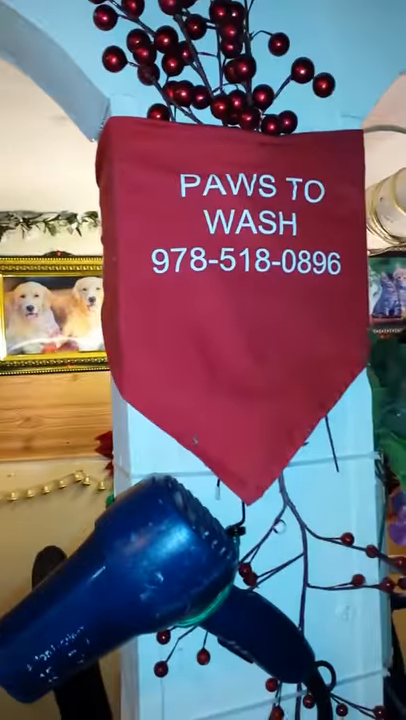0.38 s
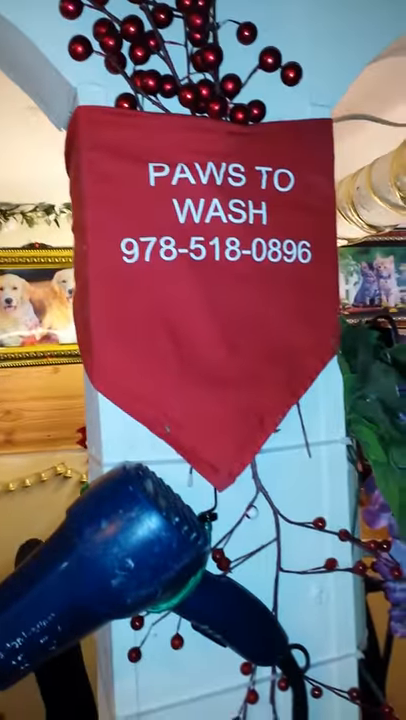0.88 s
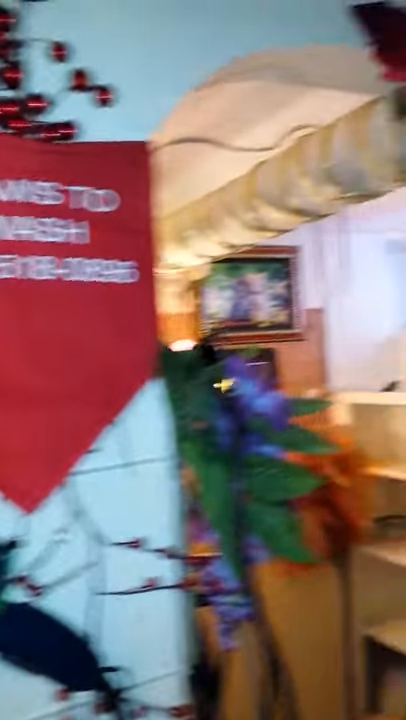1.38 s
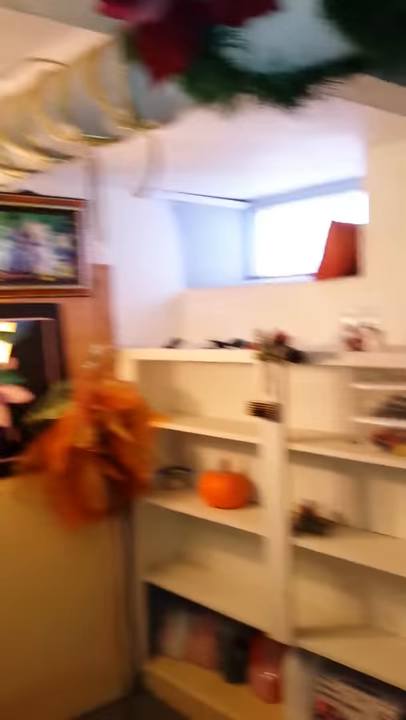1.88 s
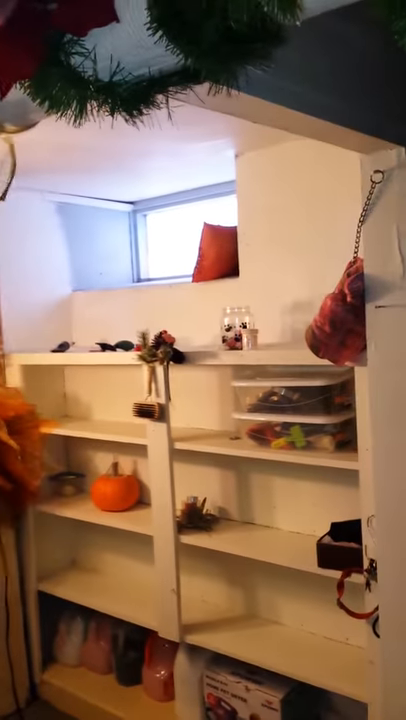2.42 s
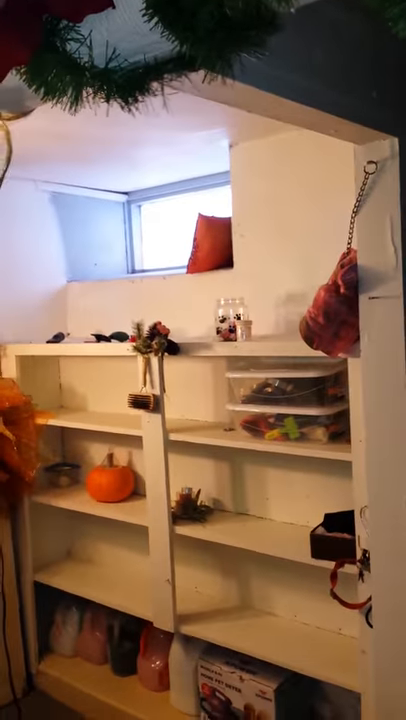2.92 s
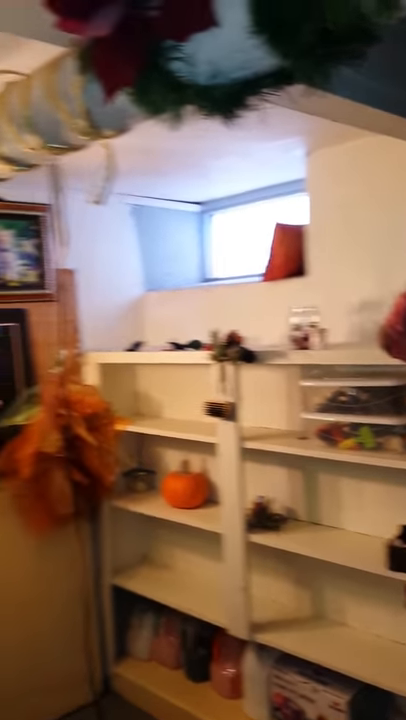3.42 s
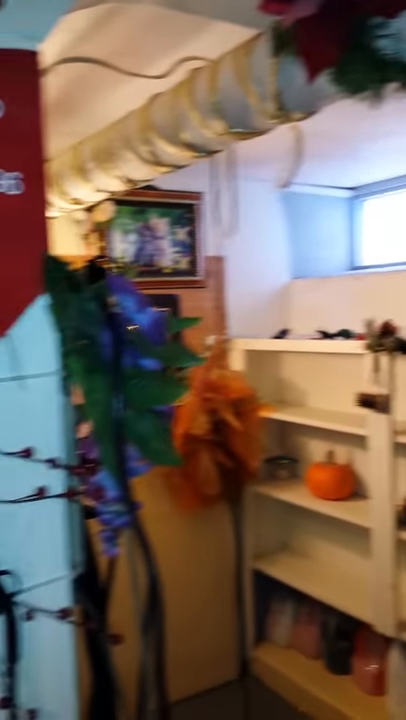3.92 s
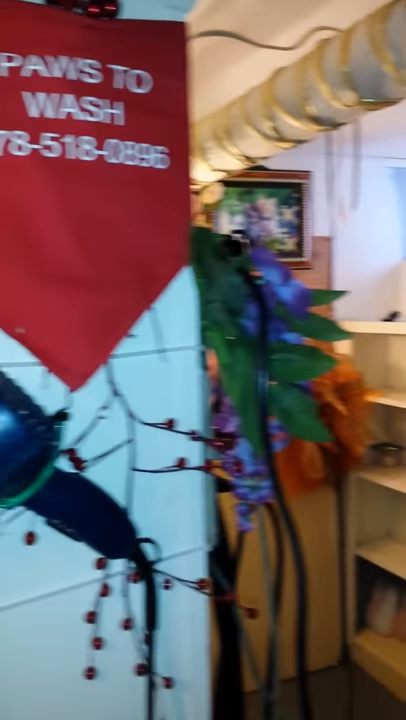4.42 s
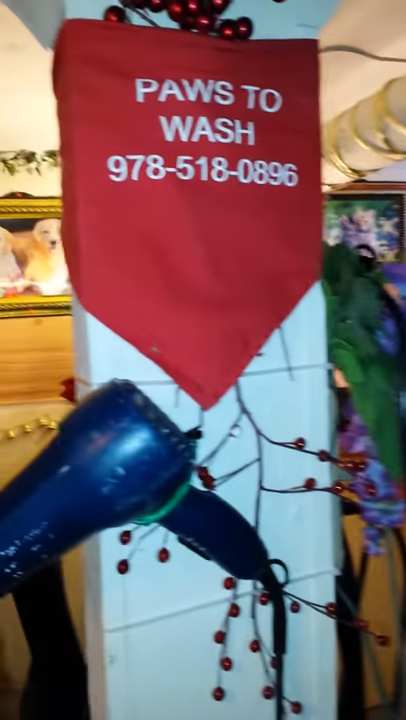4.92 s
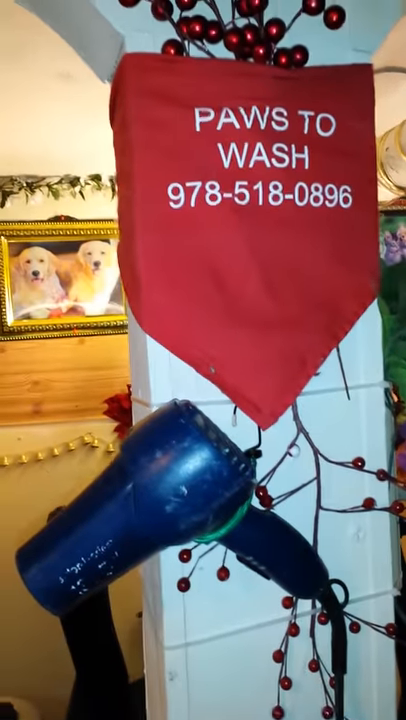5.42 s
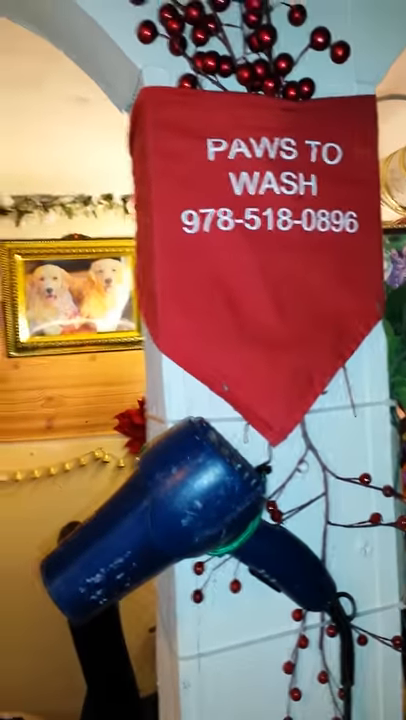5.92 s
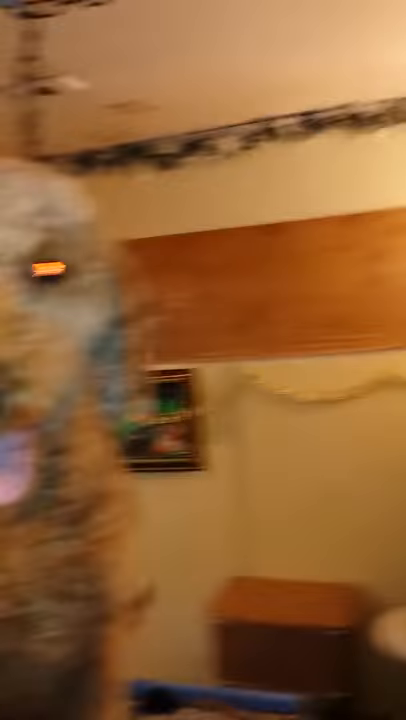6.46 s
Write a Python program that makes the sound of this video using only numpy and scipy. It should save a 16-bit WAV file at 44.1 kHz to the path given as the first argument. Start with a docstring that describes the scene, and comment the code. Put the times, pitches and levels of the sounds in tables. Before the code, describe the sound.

From 0 to about 6.6 seconds a small blow dryer runs continuously, already at full speed and never stopping. Close, bright air roar fills both ears, dense and hissy, with a hollow barrel resonance. Inside it sit a steady fan tone near 1.46 kHz, its overtones, and a thin whine around 7.3 kHz, shimmering and wandering left and right; pitch barely sags. Around 1.2 to 2 seconds the tone colour and stereo balance shift, then settle until about 3.3, changing again from 3.5 to 5 and after 6. Very faint dog pants puff at 0.2, from 0.7 to 2.1, 2.5 to 3.4, 3.6 to 4.3, and 4.5 to 6.2 seconds, about five per second. Soft, dull footfalls land near 3.4, 3.7, 4.0 and 4.4. Low mains hum and room rumble lie beneath. Indoor, handheld stereo microphone.

```python
"""Blow dryer in a grooming room

A small dryer runs steadily: shaped noise is the air roaring through its barrel, and sines on multiples of the
shaft speed are the whine of its seven-blade fan. Beneath lie mains hum (sines) with room rumble (resonant noise),
a few soft footfalls (damped sines) and a dog's faint panting (puffs of filtered noise). Two unlike microphone
ports hear it all; the roar blends between four colours, so colour and whine shift between the ears."""
import sys
import numpy as np
from scipy import signal
from scipy.fft import rfft, irfft
from scipy.io import wavfile
from scipy.ndimage import uniform_filter1d

SR = 44100
rng = np.random.default_rng(int(sys.argv[2]) if len(sys.argv) > 2 else 0)


def wrap_up_sound(samples):
    """Save the sound to the file named by the first command line argument, as 16-bit audio."""
    columns = np.atleast_2d(samples).T
    # keep every value between -1 and 1, then stretch to whole-number steps
    tamed = np.clip(columns, -1, 1)
    steps = np.round(tamed * 32767).astype(np.int16)
    wavfile.write(sys.argv[1], SR, steps)


def voltage_ratio(decibels):
    """Convert decibels (scalar or array-like) to amplitude ratios, 20 dB per decade."""
    exponent = np.asarray(decibels, float) / 20
    return 10 ** exponent


N = 289737
TIME, FREQ = np.arange(N) / SR, np.fft.rfftfreq(N, 1 / SR)  # s, Hz
BLADES = 7


def read(table, at, log=False):
    """Linear interpolation: every column after the first, joined by straight lines."""
    x, *columns = np.transpose(table)
    warp = np.log1p if log else np.asarray
    return np.array([np.interp(warp(at), warp(x), column) for column in columns])


def walk(rate):
    """Smoothed random modulation: levels held 1 / rate s, then slewed twice; spread near 1."""
    hold = int(SR / rate)
    levels = np.repeat(rng.standard_normal(N // hold + 1), hold)
    slewed = uniform_filter1d(uniform_filter1d(levels, hold), hold)
    return 1.52 * slewed[:N]


def noise():
    """White noise: a random spectrum of equal power density, 0 dB per Hz."""
    return rfft(rng.standard_normal(N)) * np.sqrt(SR / 2)


def rings(modes):
    """Resonance: power per Hz of a few steep peaks, summed."""
    power = 0
    for hz, width, db in modes:
        detuning = 2 * (FREQ - hz) / width
        power = power + voltage_ratio(2 * db) / (1 + detuning ** 2) ** 2
    return power


def tone(phase, left_db, right_db, lead):
    """Interaural difference: one sine with its own rms level and half the phase lead at each port."""
    left = voltage_ratio(left_db) * np.sin(phase + lead / 2)
    right = voltage_ratio(right_db) * np.sin(phase - lead / 2)
    return np.sqrt(2) * np.array([left, right])


# mains multiples: (frequency [Hz], mean level [dB])
MAINS = [(120, -56.5), (180, -61.5), (240, -67)]


def mains_hum():
    """Harmonics of the supply: wavering sines at multiples of the mains, alike at both ports."""
    return sum(tone(2 * np.pi * hz * TIME, db, db, 0) * voltage_ratio(1.1 * walk(3.6)) for hz, db in MAINS)


# low room modes: (frequency [Hz], width [Hz], power density [dB per Hz])
ROOM_MODES = [(79, 18, -63.5), (119, 38, -68.5), (140, 26, -68), (178.5, 32, -67), (238, 32, -73),
              (316, 42, -70)]


def room_rumble():
    """Modal response of an enclosure: noise heard through low room modes, nearly alike at both ports."""
    shape = np.sqrt(rings(ROOM_MODES))
    mid, side = irfft(noise() * shape, N), irfft(noise() * shape, N)
    return mid + voltage_ratio(-19) * side * np.array([[1], [-1]])


# footfalls: (time [s], nominal level [dB], frequency [Hz])
FOOTFALLS = [(3.36, -35, 115), (3.72, -34, 135), (4.02, -36, 146), (4.391, -36, 310)]


def footfalls(rise_s=0.0052, fall_s=0.015):
    """Damped oscillation: each soft step sets off a few decaying cycles of the floor."""
    out = 0
    for start_s, db, hz in FOOTFALLS:
        age = np.clip(TIME - start_s, 0, None)
        envelope = 2 * (1 - np.exp(-age / rise_s)) * np.exp(-age / fall_s)
        out = out + voltage_ratio(db) * envelope * np.sin(2 * np.pi * hz * age)
    return out


# bouts of even panting: (start [s], time between pants [s], pants [count], mean level at the left port [dB])
PANTING_BOUTS = [(.16, .19, 2, -41), (.72, .34, 1, -42), (1.06, .206, 6, -40), (2.53, .25, 1, -36),
                 (2.78, .197, 4, -37), (3.63, .21, 4, -38), (4.49, .215, 9, -36)]
# resonances of the open mouth: (frequency [Hz], width [Hz], relative level [dB])
MOUTH_RESONANCES = [(560, 200, -8), (1370, 150, 0), (1650, 250, -7), (1950, 200, -8), (3100, 400, -9)]


def panting(half_s=.017, scatter_db=2):
    """Source and filter: each pant is a short puff of breath noise through an open mouth."""
    breath = irfft(noise() * np.sqrt(rings(MOUTH_RESONANCES)), N)
    puffs = 0
    for start_s, gap_s, count, db in PANTING_BOUTS:
        for k in range(count):
            level = voltage_ratio(db + scatter_db * rng.standard_normal())
            puffs = puffs + level * np.exp(-((TIME - start_s - k * gap_s) / half_s) ** 2)
    port_gain = voltage_ratio(np.array([[0], [-1]]))  # the right port hears it 1 dB lower
    return breath / breath.std() * puffs * port_gain


# mean shaft speed: (time [s], frequency [Hz])
SPEED = [(0, 208.36), (.8, 208.45), (1.4, 208.44), (1.9, 208.38), (2.4, 208.44), (3.6, 208.33),
         (4.9, 208.11), (5.6, 208.15), (6.4, 207.92), (6.57, 207.94)]


def shaft_angle(jitter_hz=0.018):
    """Phase as the integral of frequency: the slightly unsteady shaft's angle in radians."""
    speed_hz = read(SPEED, TIME)[0] + jitter_hz * walk(12)
    return 2 * np.pi * np.cumsum(speed_hz) / SR


# weaker shaft multiples, before their swells: (multiple of shaft speed [-], left level [dB],
# right level [dB], left's phase lead [rad], left gain at blend 1 [dB])
SHAFT_MULTIPLES = [(1, -48, -57, -2, 0.5), (2, -53, -61.5, -2, -10), (3, -48, -50, -0.6, -2),
                   (4, -38, -44, -.5, -2), (5, -41, -43, 2, -4), (6, -43.5, -52, 1.1, 1.5),
                   (8, -49, -54, 2, 0), (9, -46, -53, 3.5, -4), (10, -47, -62, -1.5, -2),
                   (11, -45.5, -52, -0.5, 2), (12, -42, -50, -4.5, -5), (30, -43, -45, -1.5, 6),
                   (42, -53, -47, 6, -3)]


def imbalance_tones(angle, blend):
    """Rotating imbalance: tones at shaft multiples, each swelling and fading at random."""
    second = np.clip(1 - abs(blend - 1), 0, 1)
    out = 0
    for multiple, left_db, right_db, lead, gain_db in SHAFT_MULTIPLES:
        # higher multiples waver more deeply in level
        depth_db = 2.0 * min(multiple / 12, 1)
        start = 2 * np.pi * rng.random()
        left = left_db + gain_db * second + depth_db * walk(2.5)
        right = right_db + depth_db * walk(2.2)
        out = out + tone(multiple * angle + start, left, right, lead)
    return out


# blade-tone multiples before drift: (blend [-], then left level [dB], right level [dB] for multiples 2, 3, 4)
OVERTONE_LEVELS = [(0, -55, -47, -35, -48, -33, -36), (1, -38, -47, -43, -39, -30, -52),
                   (2, -56, -52, -36, -47, -37, -39), (3, -46, -44, -41, -42, -32, -39)]
# phase by which left leads, for multiples 2, 3, 4: ([rad], [rad], [rad])
OVERTONE_PHASES = (-0.99, -.3, 1.7)


def blade_overtones(angle, blend, shimmer_db=1.0, drift_db=2):
    """Harmonics of blade passing: multiples 2 to 4, drifting at each port and shimmering at both."""
    level_db = read(OVERTONE_LEVELS, blend)
    out = 0
    for k, lead in enumerate(OVERTONE_PHASES):
        left_db, right_db = (level_db[2 * k + port] + drift_db * walk(2.54) for port in range(2))
        overtone = tone((k + 2) * BLADES * angle, left_db, right_db, lead)
        out = out + overtone * voltage_ratio(shimmer_db * walk(8.6))
    return out


# fifth multiple of the blade tone, before shimmer:
# (time [s], left level [dB], right level [dB], left's phase lead [rad])
THIN_WHINE = [(0, -28, -25, -1.2), (.5, -26.5, -24, -1.5), (1.0, -31, -24, -1.9), (1.4, -23, -24, 0.5),
              (1.65, -21.5, -26, -0.5), (1.85, -25, -36, -1.8), (2.2, -28, -27, -1.5),
              (2.5, -33, -27, -1.1), (2.95, -32, -26, -1), (3.2, -29, -27, -.3), (3.5, -29, -35, 0.5),
              (3.8, -21, -26, -2), (4.1, -25, -24, -2.2), (4.6, -23, -23, -3.5), (5.2, -22, -20.5, -3),
              (5.6, -27, -17.5, -2), (5.9, -28, -21, -2.5), (6.2, -25, -27, -2.5), (6.4, -30, -19.5, -4.5),
              (6.57, -27, -19, -7.5)]


def thin_whine(angle, shimmer_db=1.0):
    """Fifth harmonic of blade passing: a thin, shimmering whine that moves between the ports."""
    return tone(5 * BLADES * angle, *read(THIN_WHINE, TIME)) * voltage_ratio(shimmer_db * walk(15))


# blade tone at the two ports: (time [s], left level [dB], right level [dB])
BLADE_LEVELS = [(0, -39, -35), (.8, -35, -34), (1.2, -37, -37), (1.55, -34, -48), (1.7, -46, -56),
                (1.85, -42, -58), (1.95, -34, -48), (2.2, -31, -40), (3.1, -32, -37), (3.7, -33, -47),
                (4.2, -32, -36), (5.0, -39, -30.5), (5.6, -38, -31.5), (6.0, -35, -31.5), (6.57, -37, -35)]
# its phase: (blend [-], left's lead [rad])
BLADE_PHASE = [(0, .1), (1, 0.94), (2, -.6), (3, -1.3)]


def blade_tone(angle, blend):
    """Blade passing: the fan sounds at the number of blades times the shaft speed."""
    return tone(BLADES * angle, *read(BLADE_LEVELS, TIME), read(BLADE_PHASE, blend)[0])


def fan(blend):
    """Rotor harmonics: every tone of the fan is locked to one shaft angle."""
    angle = shaft_angle()
    blades = blade_tone(angle, blend) + thin_whine(angle) + blade_overtones(angle, blend)
    return blades + imbalance_tones(angle, blend)


# air roar as each port colours it, before blend and echoes: (frequency [Hz], power density [dB per Hz])
LEFT_COLOUR = [(120, -90), (300, -66), (600, -63), (1100, -68), (1250, -61), (1600, -63.5), (2500, -58),
               (3400, -54), (4100, -56), (5100, -51.5), (5600, -57.5), (7600, -54.5), (10000, -66),
               (15000, -95)]
RIGHT_COLOUR = [(120, -88), (300, -71), (600, -60.5), (800, -58.5), (1250, -72), (1500, -66.5), (1750, -64),
                (2050, -61), (2800, -63), (3300, -59.5), (5800, -58.5), (8500, -58), (10000, -63.5),
                (15000, -78)]
# barrel and port resonances added to it: (frequency [Hz], width [Hz], power density [dB per Hz])
LEFT_RESONANCES = [(771, 94, -51.5), (857, 137, -49.5), (928, 110, -57), (6520, 1320, -52.5),
                   (5100, 250, -61), (4400, 250, -63), (3200, 230, -66)]
RIGHT_RESONANCES = [(906, 150, -59), (994, 180, -54.5), (7490, 1210, -50), (5430, 250, -61),
                    (4650, 250, -68), (3760, 200, -61)]
# change from the first colour: (frequency [Hz], second left [dB], right [dB], third left [dB], right [dB])
MIDDLE_COLOURS = [(500, -1, -2.5, -0.5, -1.5), (800, 2, 2.5, 3, 4), (970, 5, 0, 1, -0.5),
                  (1310, 2, 5.5, 2, 1), (1560, -1, -0.5, 0.5, -1), (2170, 3.5, 2, 1, -1.5),
                  (2650, -4, 0, -2, 2.5), (3670, -2, 1, 0, -1.5), (4000, -4.5, -2.5, 0, -0.5),
                  (4500, -2.5, 0, -2, -1), (5120, -5.5, 0, -1.5, 0), (5600, -1, 1.5, -4.5, -3.5),
                  (6240, 5, -0.5, 1.5, 1.5), (7730, -6, -2.5, -1.5, -3), (12500, -0.5, 3.5, -5, 3.5)]
# change from the first colour to the last: (frequency [Hz], left [dB], right [dB])
LAST_COLOUR = [(300, 3.5, 1), (580, -5, -5), (800, -2, 3), (960, 6, -4), (1200, -3.5, -1.5),
               (2700, -3.5, -1), (4500, -5.5, -2), (6500, 0.5, -0.5), (9500, -6, -1.5), (13000, -4, 0)]
# likeness of the ports: (frequency [Hz], then correlation [0-1] and left's phase lead [rad]
# for the first, second and third colour)
PORT_LIKENESS = [(503, 1, 0.5, .85, 0.06, 0.95, 0.57), (610, 0.99, .5, 0.92, .5, .85, 0.57),
                 (750, 0.74, -0.1, 0.51, 1.3, .72, 0.96), (950, 0.64, 1, 0.43, 0.5, 0.41, -0.58),
                 (1220, 0.54, 1, 0.26, 1.5, 0.46, 0.2), (2200, 0.41, 1, 0.65, 0.56, 0.75, .4),
                 (2930, 0.36, 2, 0.36, 1, .35, 0.87), (3850, 0.31, 0.6, 0.4, -2.5, 0.62, 1.26),
                 (4070, 0.28, 2.8, 0.2, -2, .27, 1.2), (4780, 0.52, -1.5, 0.67, 2.5, 0.53, 0.2),
                 (5900, .1, 3, 0.67, -1, .17, -1.4), (7740, 0.68, -1.5, .4, -0.9, 0.75, -1.9),
                 (10200, 0.13, -3.5, 0.56, -1, 0.18, -1.4), (15000, .12, -9, .12, -9, .12, -1)]
# two near surfaces reflect the roar, a list for left then right:
# (delay in first colour [s], second [s], third [s], share of the direct sound [-])
REFLECTIONS = [
    [(.0019, 0.00167, .0019, 0.057), (0.00132, 0.001413, 0.00137, 0.04)],
    [(.0019, .0019, .00192, 0.22), (0.00089, .0014, .0014, 0.022)],
]


def air_roar(blend, top_db, flutter_db=1.1, flutter_hz=9, top_hz=11000):
    """Jet turbulence: one part reaches both ports, the rest comes from all round; echoes comb-filter both."""
    likeness = read(PORT_LIKENESS, FREQ, log=True)
    first_db = np.zeros((2, len(FREQ)))
    middle_db, last_db = read(MIDDLE_COLOURS, FREQ, log=True), read(LAST_COLOUR, FREQ, log=True)
    change_db = np.vstack([first_db, middle_db, last_db])
    direct = noise()
    top = 1 / (1 + (top_hz / (FREQ + 1)) ** 6)
    swell, flutter = walk(5.6), walk(flutter_hz)
    ports = (LEFT_COLOUR, LEFT_RESONANCES), (RIGHT_COLOUR, RIGHT_RESONANCES)
    out = []
    for port, (colour, resonances) in enumerate(ports):
        gain = np.sqrt(voltage_ratio(2 * read(colour, FREQ, log=True)[0]) + rings(resonances))
        diffuse, low, high = noise(), 0, 0
        for k in range(4):
            near = min(k, 2)  # the last colour keeps the likeness and echoes of the third
            like, lead = np.clip(likeness[2 * near], 0, 1), likeness[2 * near + 1]
            shared = np.sqrt(like) * direct * np.exp(.5j * lead * (1 - 2 * port))
            air = shared + np.sqrt(1 - like) * diffuse
            echo = 1 + sum(row[3] * np.exp(-2j * np.pi * FREQ * row[near]) for row in REFLECTIONS[port])
            air = air * gain * echo * voltage_ratio(change_db[2 * k + port])
            weight = np.clip(1 - abs(blend - k), 0, 1)  # crossfade between colours
            low = low + weight * irfft(air * (1 - top), N)
            high = high + weight * irfft(air * top, N)
        # the top treble wavers quickly in level
        high_db = top_db[port] + flutter_db * (flutter + walk(flutter_hz))
        out.append(low * voltage_ratio(0.32 * swell) + high * voltage_ratio(high_db))
    return np.array(out)


# blend of the roar's colours over time: (time [s], blend [0 first, 1 second, 2 third, 3 last],
# gain of the top treble at left [dB], at right [dB])
COLOUR_BLEND = [(0, 0.7, 1, .3), (.6, 0, 1, 2.5), (1.2, .5, 1, 3), (1.6, 1.7, 2, 2.5), (2.1, 1.05, .5, 0.5),
                (3.1, 1, 0, -2), (3.8, 1.5, -1.5, 3), (4.2, 1.45, -4, 2), (4.6, 2.1, -6, -1),
                (5.0, 2, -1, -1.2), (5.5, 2.5, -2, 0), (5.9, 2, 5, -1.5), (6.2, 2.5, 3, -2),
                (6.3, 2.97, 0, -4)]


def scene():
    """Superposition: room, dog and dryer add up at the two ports."""
    blend, *top_db = read(COLOUR_BLEND, TIME)
    blend = np.clip(blend, 0, 3)
    background = mains_hum() + room_rumble() + footfalls() + panting()
    return background + fan(blend) + air_roar(blend, top_db)


def band_limit(x):
    """A steep low-pass at the top of the band."""
    return signal.sosfilt(signal.butter(12, 15310, fs=SR, output="sos"), x)


def record(dry):
    """Two-channel pickup: the sound at both ports is the finished mix."""
    return band_limit(dry)


dry = scene()
out = record(dry)
wrap_up_sound(out)
```